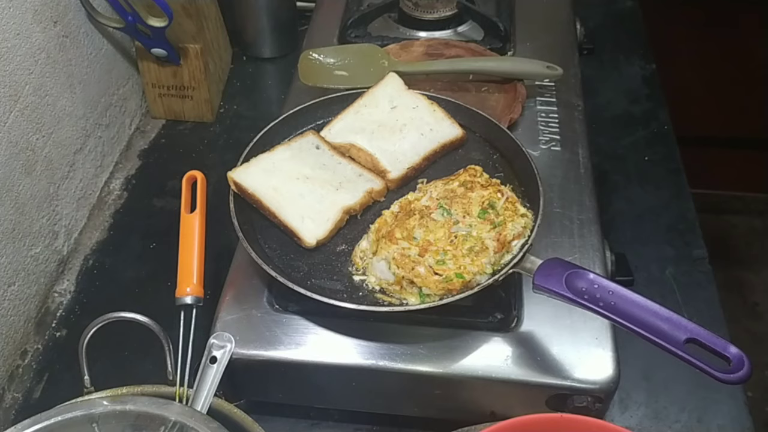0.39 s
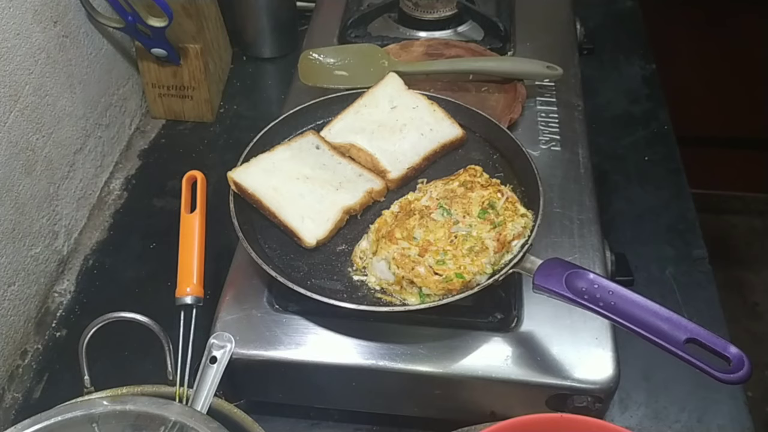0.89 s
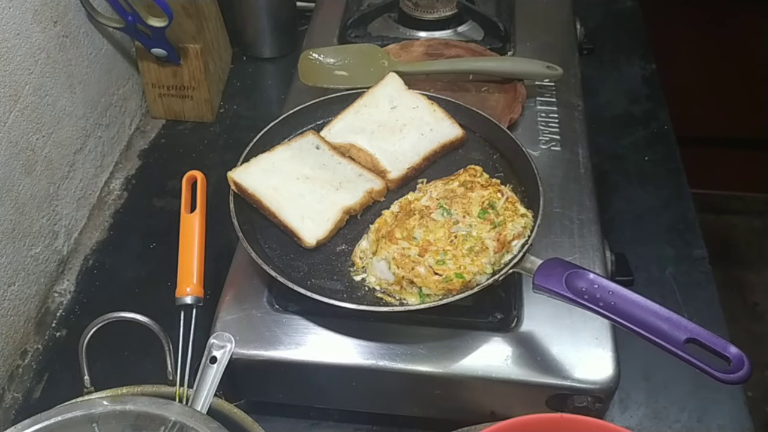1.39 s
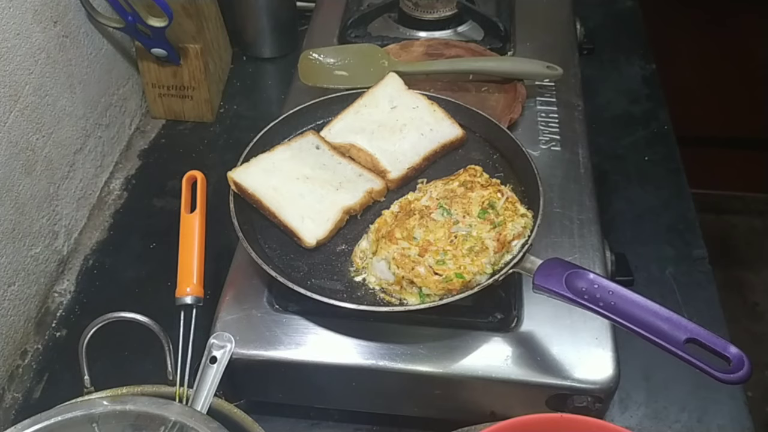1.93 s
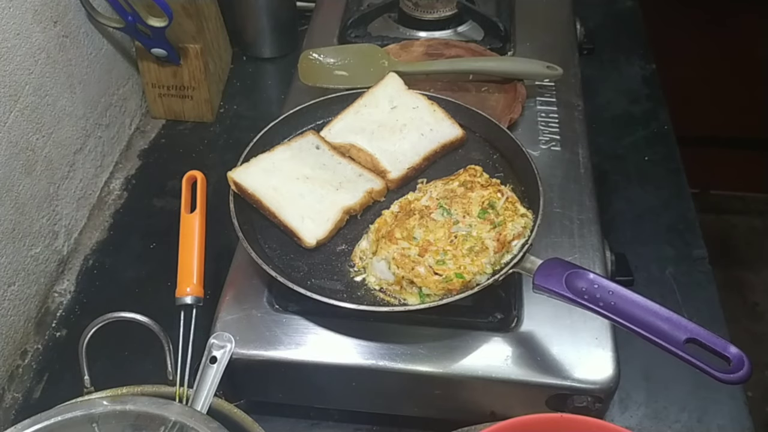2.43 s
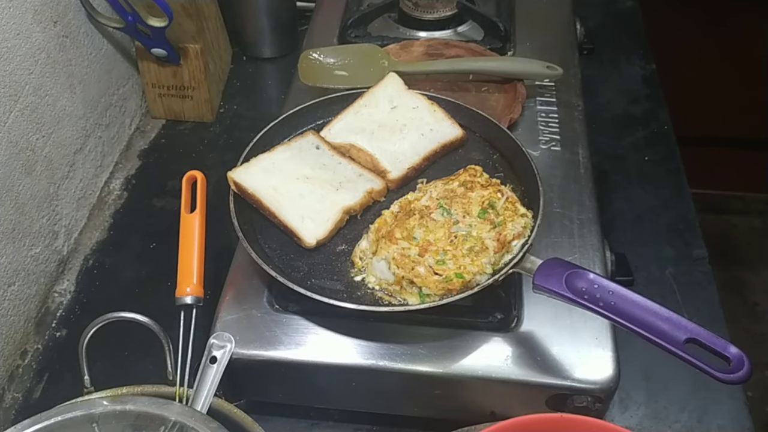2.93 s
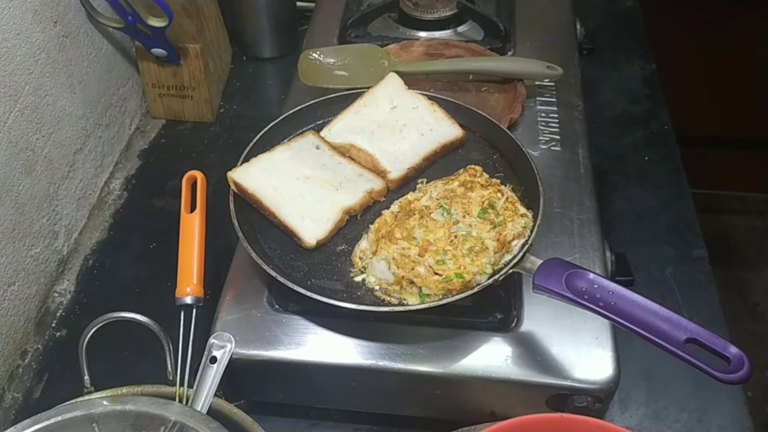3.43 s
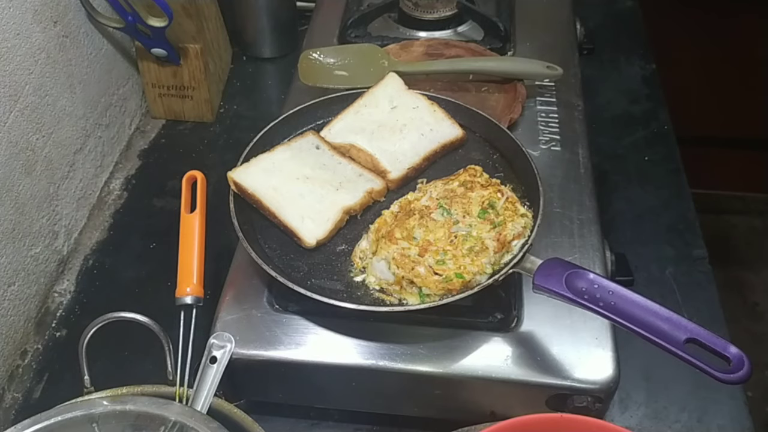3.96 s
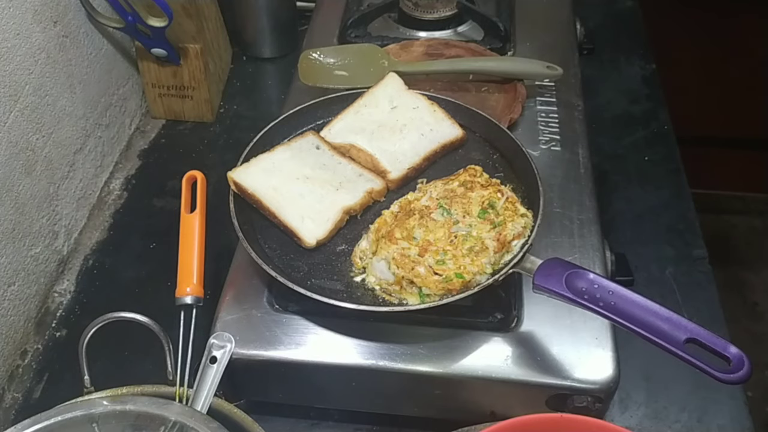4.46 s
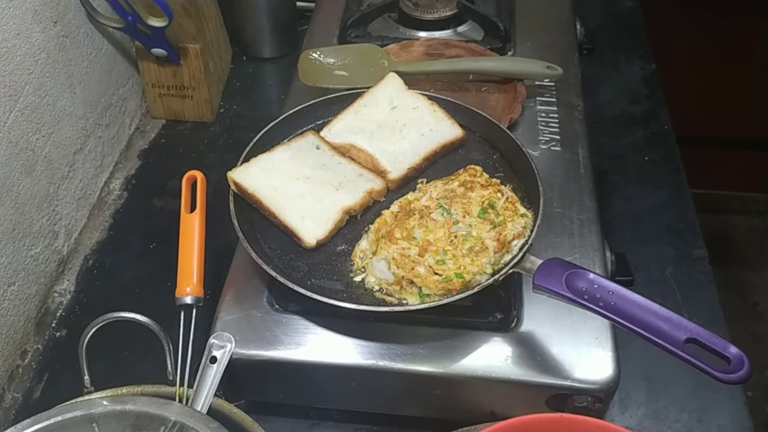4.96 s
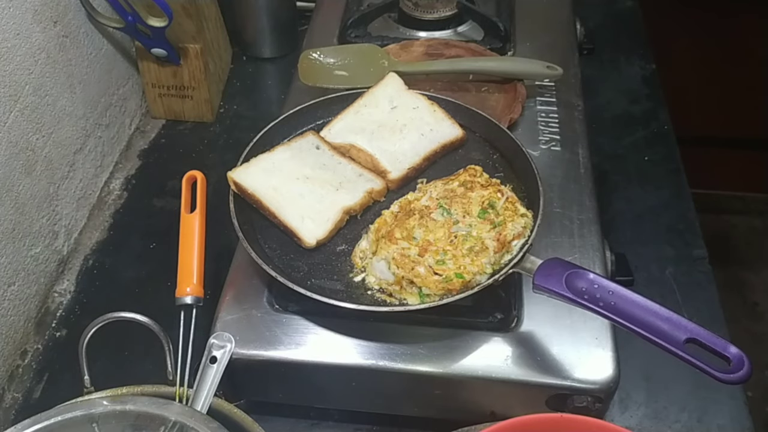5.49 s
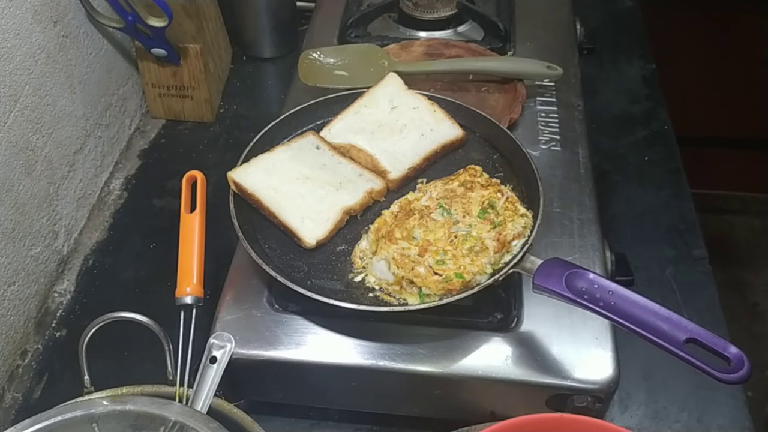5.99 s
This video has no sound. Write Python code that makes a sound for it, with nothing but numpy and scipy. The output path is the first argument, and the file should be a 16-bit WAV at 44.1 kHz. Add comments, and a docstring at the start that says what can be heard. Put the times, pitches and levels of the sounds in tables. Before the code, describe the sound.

Oil sizzling in a pan, captured by two spaced microphones close by in a small kitchen. Quiet hum and tiny spits come first, then dense, grainy steam bursts with wet gurgles underneath and dull bumps. After a short lull the frying flares in uneven spurts, snapping brightly, peaks, then eases into irregular sputters. Low rumble, steady faint flame and room hiss, no voices.

```python
"""Patty and bread frying in a pan

A kitchen stove heard by two spaced microphones. Steam bursts from under the food in spurts of
dense tiny pops over a running sizzle: random clicks, split into bands and shaped in level.
Sharp spits of oil are fading bright noise; big bubbles gurgle as noise puffs with rising notes.
Below lie soft low thumps (short waves), a lumpy rumble (low noise) and a wavering mains hum (sine);
a steady hiss of flame and room fills the background."""
import sys
import numpy as np
from scipy import signal
from scipy.io import wavfile

SR = 44100
rng = np.random.default_rng(int(sys.argv[2]) if len(sys.argv) > 2 else 0)


def gain_from_db(level_db):
    """Convert decibel levels to linear amplitude factors (20 dB per decade)."""
    decades = np.asarray(level_db, float) / 20
    return 10 ** decades


def dump(signal):
    """Clip the signal to [-1, 1] and save it as 16-bit WAV at the path in sys.argv[1]."""
    limited = np.clip(np.atleast_2d(signal).T, -1, 1)
    pcm = np.round(limited * 32767).astype(np.int16)
    wavfile.write(sys.argv[1], SR, pcm)


N = 269786
STEP = 32   # samples between control points

# All table levels are nominal: flutter, balance and tone shaping move them.
# Running sizzle. Each row: time in seconds, level in dB, fullness in dB near 300 Hz against 4500 Hz.
SIZZLE_CURVE = [(0.0, -65, -1), (0.5, -66.5, -4), (0.9, -62.5, 2), (1.1, -48.5, 5), (2.0, -48.5, 5.5),
                (2.6, -46.5, 3.5), (3.2, -50, 3.5), (3.36, -61.5, 2.5), (3.55, -66, 3), (4.0, -55, 1.6),
                (4.6, -58, 4), (5.3, -59.5, 3), (5.7, -53.5, 2.5), (6.12, -58, 2)]
# Spurts of steam. Each row: start in seconds, level in dB, rise in ms, hold in ms.
STEAM_SPURTS = [(0.081, -68, 10, 1.7), (0.374, -75, 2.3, 1.7), (0.482, -68, 7.7, 1.7),
                (0.535, -55.5, 2.9, 3.2), (0.639, -76, 11, 0.8), (0.811, -60, 12, 3.9),
                (0.918, -43.5, 21, 9.6), (0.988, -44, 11, 3.4), (1.029, -44, 5.9, 17), (1.097, -63, 21, 83),
                (1.17, -41.5, 73, 14), (1.324, -39, 15, 6.2), (1.408, -40.7, 24, 9.9),
                (1.456, -43.5, 54, 15), (1.592, -50.5, 43, 6.9), (1.624, -44, 5.1, 8.6),
                (1.722, -46.5, 6.2, 63), (1.855, -43.5, 17, 103), (1.979, -38.5, 18.5, 31),
                (2.115, -41.5, 24, 2.3), (2.173, -44, 23, 11), (2.246, -47.5, 10, 189.3),
                (2.271, -48, 11, 20), (2.478, -45, 8.3, 19), (2.533, -45.5, 19.5, 71),
                (2.692, -51, 24.0, 8.6), (2.744, -43, 67, 23), (2.841, -40.5, 31, 37),
                (2.946, -40.5, 21, 13.5), (3.056, -43, 73, 37), (3.182, -39, 71.5, 22),
                (3.35, -54.5, 6.2, 9.3), (3.397, -63, 6.6, 15), (3.447, -59.5, 10, 28.3),
                (3.555, -57.5, 21, 1.5), (3.613, -41.5, 43, 5.3), (3.674, -43, 25, 100),
                (3.779, -38.5, 57, 53), (3.89, -41, 40, 18.1), (3.983, -44, 3.7, 52),
                (4.047, -40, 54.3, 29), (4.205, -50.5, 12.5, 42), (4.262, -34.0, 31, 39),
                (4.455, -31.5, 18.0, 53), (4.64, -57, 8.2, 52), (4.695, -44, 7, 72.5),
                (4.754, -44, 6.8, 34), (4.852, -49.5, 5.9, 18.3), (4.877, -36.5, 17, 49),
                (5.003, -50.5, 4.7, 3.1), (5.058, -41, 16.5, 62), (5.178, -48, 3, 2.5),
                (5.218, -47, 30, 0.3), (5.313, -51.5, 20, 32), (5.402, -40.5, 30.4, 21),
                (5.474, -43.5, 19, 52), (5.586, -44, 10, 82), (5.746, -49.5, 10, 12),
                (5.858, -39.5, 21.6, 45), (5.972, -55, 10, 24.0), (6.048, -50.5, 3.1, 4.2),
                (6.095, -39.5, 17, 1.1)]
# Tone of the frying. Each row: frequency in Hz, density in dB per Hz.
SIZZLE_SPECTRUM = [(150, -37), (250, -6.5), (398, -9), (465, -5.5), (591, -6), (1080, -3.5), (1260, -5.5),
                   (1840, -4), (2010, -2), (3540, -2.5), (9950, 0), (14000, -8), (15300, -11)]
# Likeness of left and right. Each row: frequency in Hz, correlation from -1 to 1.
STEREO_LIKENESS = [(60, 0.99), (99, 0.99), (160, 0.98), (270, 0.8), (450, 0.73), (740, 0.25), (1220, -0.05),
                   (2010, 0.05), (3330, -0.03), (5500, 0.04), (9080, -0.03), (15000, 0.03)]
# Single sharp spits of oil. Each row: start in seconds, peak level in dB.
OIL_SPITS = [(0.088, -48), (0.377, -42), (0.488, -44), (0.546, -32.5), (0.65, -39.5), (0.9348, -32),
             (1.0087, -21.5), (1.3319, -19.5), (1.427, -35), (1.607, -42), (1.7245, -43), (1.8754, -25),
             (2.1294, -24), (2.7926, -23), (2.955, -19), (3.6274, -46), (3.646, -32), (3.92, -32),
             (4.1, -19.5), (4.2152, -27.5), (4.28, -36), (4.447, -35), (4.4646, -19), (4.7024, -36),
             (4.859, -29.5), (4.888, -46), (5.01, -30.5), (5.057, -38), (5.074, -41), (5.1827, -32),
             (5.2276, -40), (5.242, -27), (5.421, -30), (5.598, -26), (5.8686, -30), (6.1035, -34)]
# Big bubbles from under the food. Each row: start in seconds, level in dB, length in seconds,
# pitch in Hz halfway through.
BUBBLE_GURGLES = [(0.048, -62.5, 0.035, 654), (0.79, -60, 0.061, 720), (0.931, -53.5, 0.061, 490),
                  (1.182, -52, 0.019, 292), (1.40, -55, 0.04, 498), (1.737, -46.5, 0.041, 435),
                  (1.887, -48.5, 0.032, 486), (2.224, -48, 0.032, 282), (2.282, -39, 0.026, 316),
                  (2.508, -53, 0.03, 294), (2.707, -45, 0.035, 274), (2.898, -42, 0.047, 288),
                  (2.943, -47, 0.042, 255), (3.219, -48, 0.024, 470), (4.289, -56, 0.078, 386),
                  (4.475, -49.5, 0.071, 555), (4.696, -53.5, 0.042, 332), (4.752, -50.5, 0.031, 300),
                  (4.894, -53, 0.033, 464), (5.857, -57, 0.031, 533)]
# Soft low thumps. Each row: middle in seconds, peak level in dB, pitch in Hz.
LOW_THUMPS = [(0.102, -42.5, 121), (0.379, -64, 109), (0.826, -42.5, 90), (0.873, -34.5, 111),
              (0.957, -35, 106), (0.986, -26, 140), (1.091, -24.5, 117), (1.131, -30, 122),
              (1.571, -33.5, 125), (1.863, -27, 127), (1.907, -30.5, 123), (2.072, -33, 117),
              (2.112, -33, 155), (2.15, -35, 130), (2.177, -24.5, 185), (2.266, -43, 170),
              (2.377, -27.5, 170), (2.402, -35, 162), (2.476, -35.5, 144), (2.982, -40, 100),
              (3.096, -42, 137), (3.18, -34, 141), (3.464, -54, 119), (3.719, -42, 145),
              (4.117, -36.5, 151), (4.31, -47, 140), (4.427, -41, 151), (4.447, -35.5, 169),
              (5.569, -36.5, 80.5), (5.611, -37, 120), (5.67, -36, 133), (5.718, -21, 168),
              (5.735, -33, 141), (5.77, -34, 158), (5.796, -25.5, 107), (5.807, -29.5, 147),
              (5.828, -34, 151), (5.874, -37, 110)]
# Tone of the rumble. Each row: frequency in Hz, density in dB per Hz.
RUMBLE_SPECTRUM = [(15, -51), (25, -20), (43, -14), (73, 0.5), (103, -1.5), (126, -3), (152, -13.5),
                   (183, -22), (500, -33.5), (650, -61), (1100, -120)]
# Rumble between thumps. Each row: time in seconds, level in dB.
CALM_RUMBLE_CURVE = [(0, -55), (.35, -58.5), (.7, -68), (1.2, -50.5), (1.45, -61.5), (2.3, -52), (2.8, -56),
                     (3.6, -54.5), (4.0, -57.5), (4.7, -58.5), (5.35, -60.5), (5.55, -63), (5.85, -48.5),
                     (6.12, -63)]
# Swell and sag of the hum. Each row: time in seconds, level in dB.
HUM_CURVE = [(0, -48), (.2, -42.5), (.8, -45.5), (1.35, -49), (1.65, -42.5), (2.4, -50.5), (2.8, -47.5),
             (3.55, -44), (4.0, -50.5), (4.6, -44), (5.2, -50), (5.5, -48.5), (6.12, -47)]
# Tone of the flame and room hiss. Each row: frequency in Hz, density in dB per Hz.
HISS_SPECTRUM = [(170, -20), (260, 2.5), (500, -5.5), (1000, -8.5), (2000, -11.5), (4000, -11),
                 (8000, -20.5), (10500, -3.5), (13000, -7.5), (15300, -13)]


def rms_one(x):
    """Scale to unit rms."""
    return x / np.sqrt(np.mean(x ** 2) + 1e-20)


def coarse_time():
    """Times of the control points in seconds."""
    return np.arange(N // STEP + 2) * STEP / SR


def in_time(rows):
    """Read each column of a time curve at the control points."""
    s, *columns = np.transpose(rows)
    return [np.interp(coarse_time(), s, column) for column in columns]


def fine(control):
    """Glide from control points to samples."""
    return np.interp(np.arange(N) / STEP, np.arange(len(control)), control)


def at_hz(points, hz):
    """Read a tone table on a log-frequency axis."""
    table_hz, value = np.transpose(points)
    return np.interp(np.log(hz), np.log(table_hz), value)


def drift(rate_hz):
    """Random wander of unit rms at the control points: noise through two equal one-pole lowpasses."""
    r = np.exp(-2 * np.pi * STEP * rate_hz / SR)
    noise = rng.standard_normal(N // STEP + 2002)
    slow = signal.lfilter([1], [1, -2 * r, r * r], noise)[2000:]   # skip the settling
    return rms_one(slow)


def bands(source, edges, spectrum, gain_at):
    """Split noise into bands, each with its own tone level, moving gain and left-right likeness."""
    centres = np.sqrt(edges[1:] * edges[:-1])
    power = np.sum(gain_from_db(at_hz(spectrum, centres)) ** 2 * np.diff(edges))
    total = np.sqrt(power * 2 / SR)
    out = 0
    for k, hz in enumerate(centres):
        sos = signal.butter(2, edges[k:k + 2], "band", fs=SR, output="sos")
        mid, side = signal.sosfilt(sos, source[k % 2])   # neighbouring bands use separate noise
        alike = np.clip(at_hz(STEREO_LIKENESS, hz), -.99, .99)
        pair = np.sqrt(1 + alike) * mid + np.sqrt(1 - alike) * side * [[1], [-1]]
        out = out + gain_from_db(at_hz(spectrum, hz)) * fine(gain_at(hz)) * pair
    return out / total


def pops(per_s, spread_db, flares_per_s, flare_db):
    """Thousands of bubbles burst each second with uneven force; short flares lift both sides."""
    shape = (2, 2, N)
    born = rng.random(shape) < per_s / SR
    force = gain_from_db(spread_db * np.minimum(rng.exponential(1, shape), 5))
    flare_born = rng.random(N) < flares_per_s / SR
    flares = flare_born * gain_from_db(flare_db + 1.0 * rng.standard_normal(N))
    swell = 1 + signal.lfilter([1], [1, -.985], flares)   # time constant about 1.5 ms
    return rms_one(swell * born * force * rng.standard_normal(shape))


def spurt_shapes():
    """Power of each steam spurt, which rises, holds with a slow sag and dies away."""
    t60_s, sag_db_per_s = 0.19, 8   # the sag starts after the rise and adds to the fade
    at, _, rise_ms, hold_ms = np.array(STEAM_SPURTS).T[:, :, None]
    age_ms = 1000 * np.maximum(coarse_time() - at, 0)
    rise = np.sin(np.pi / 2 * np.minimum(age_ms / rise_ms, 1)) ** 2
    fading_s = np.maximum(age_ms - rise_ms - hold_ms, 0) / 1000
    sagging_s = np.maximum(age_ms - rise_ms, 0) / 1000
    return (rise * gain_from_db(-60 * fading_s / t60_s - sag_db_per_s * sagging_s)) ** 2


def sizzle():
    """Bubbles pop densely, shaped by the running level and the spurts of steam."""
    usual_spurt_db, usual_thinning_db, thinning_per_db = -44, 3, 0.3
    level_db, fullness_db = in_time(SIZZLE_CURVE)
    spurt_db = np.array(STEAM_SPURTS)[:, 1]
    spurt_power = spurt_shapes()
    thin_db = usual_thinning_db + thinning_per_db * (spurt_db - usual_spurt_db)
    sputter_db = 1.97 * drift(24) + 0.1 * drift(90)   # all bands surge together

    def gain_at(hz):
        """Lower bands follow the fullness, less so in strong spurts; every band also flickers alone."""
        low = np.clip(np.log2(4500 / hz) / 3.9, -.4, 1.4)   # 0 at 4500 Hz, about 1 at 300 Hz
        spurts = gain_from_db(spurt_db - low * thin_db) ** 2 @ spurt_power
        vigour = np.sqrt(gain_from_db(level_db) ** 2 + spurts)   # powers add
        flicker_db = 1.46 * drift(9.4) + 1.25 * drift(33)
        return vigour * gain_from_db(low * fullness_db + sputter_db + flicker_db)

    edges = np.geomspace(230, 16500, num=30)
    bubbles = pops(per_s=14000, spread_db=-0.5, flares_per_s=45, flare_db=-9.5)
    return bands(bubbles, edges, SIZZLE_SPECTRUM, gain_at)


def spits(t60_s=0.043, rms_below_peak_db=9, centre_hz=10300):
    """A droplet bursts: a bright crack that dies fast, different at the two microphones."""
    length = 4000
    out, age_s = np.zeros((2, N + length)), np.arange(length) / SR
    sos = signal.butter(1, [centre_hz * .55, centre_hz * 1.5], "band", fs=SR, output="sos")
    for at, peak_db in OIL_SPITS:
        start = round(at * SR)
        crack = rms_one(signal.sosfilt(sos, rng.standard_normal((2, length))))
        out[:, start:start + length] += gain_from_db(peak_db - rms_below_peak_db - 60 * age_s / t60_s) * crack
    return out[:, :N]


def gurgles(low_hz=240, high_hz=950, alike=0.15, tone=0.71, rising=0.22):
    """A dull puff swells and fades while the bubble sings a short rising note."""
    at, level_db, length_s, _ = np.array(BUBBLE_GURGLES).T[:, :, None]
    turn = np.clip((coarse_time() - at) / length_s, 0, 1)
    gain = fine(gain_from_db(level_db[:, 0]) @ np.sin(np.pi * turn))
    sos = signal.butter(2, [low_hz, high_hz], "band", fs=SR, output="sos")
    mid, side = signal.sosfilt(sos, rng.standard_normal((2, N)))
    puff = mid + side * [[1], [-1]] * np.sqrt((1 - alike) / (1 + alike))
    out = gain * rms_one(puff)
    for at, level_db, length_s, hz in BUBBLE_GURGLES:
        start = round(at * SR)
        turn = np.linspace(0, 1, int(length_s * SR))
        cycles = hz * length_s * turn * (1 + rising * (turn - 1))   # pitch climbs by 2 * rising * hz
        note = np.sin(np.pi * turn) * np.sin(2 * np.pi * cycles)
        out[:, start:start + len(turn)] += tone * gain_from_db(level_db) * note
    return out


def thumps(cycles=0.49):
    """Each thump is a push and a deeper rebound, about one cycle long."""
    out = np.zeros(N)
    for at, peak_db, hz in LOW_THUMPS:
        middle, half = round(at * SR), int(2 * SR / hz)
        turn = np.arange(-half, half) * hz / SR
        wave = np.sin(2 * np.pi * turn + .7) * np.exp(-(turn / cycles) ** 2)
        out[middle - half:middle + half] -= gain_from_db(peak_db) * wave
    return out


def rumble():
    """Low noise flutters in lumps and swells round the strongest thump near by."""
    swell_s, usual_swell_db = 0.048, -45.5
    usual_thump_db, usual_thump_hz = -33, 130
    follow, db_per_octave = .35, -0.5   # dB per dB of thump; deep thumps stir up more rumble
    at, peak_db, hz = np.array(LOW_THUMPS).T[:, :, None]
    strength_db = follow * (peak_db - usual_thump_db)
    depth_db = db_per_octave * np.log2(hz / usual_thump_hz)
    swells = gain_from_db(usual_swell_db + strength_db + depth_db)
    swells = swells * np.exp(-((coarse_time() - at) / swell_s) ** 2)
    calm = gain_from_db(in_time(CALM_RUMBLE_CURVE)[0])
    lumps = np.sqrt(calm ** 2 + np.max(swells, axis=0) ** 2) * gain_from_db(0.78 * drift(27.0))
    edges = np.geomspace(22, 520, num=10)
    noise = rng.standard_normal((2, 2, N))
    return bands(noise, edges, RUMBLE_SPECTRUM, lambda hz: lumps * gain_from_db(2.2 * drift(3.6)))


def hum(hz=101.1):
    """A sine at twice the mains frequency, wavering a little in phase and level."""
    level_db, = in_time(HUM_CURVE)
    waver = fine(1.16 * drift(2.46) + 0.42 * drift(7.5))   # radians
    phase = 2 * np.pi * hz * np.arange(N) / SR + waver
    level = fine(gain_from_db(level_db + 0.66 * drift(3.1)))
    return np.sqrt(2) * level * np.sin(phase)


def hiss(level_db=-64.5):
    """Flame and room make a smooth noise, each band wandering only slightly in level."""
    edges = np.geomspace(180, 16500, num=14)
    noise = rng.standard_normal((2, 2, N))
    return bands(noise, edges, HISS_SPECTRUM, lambda hz: gain_from_db(level_db + .5 * drift(3)))


def scene():
    """Hum and thumps reach both microphones alike; some direct pan sound reaches the right one later."""
    share, later_s = 0.057, .00039   # share of the left signal's amplitude, delay to the right
    centre = hum() + thumps()
    left, right = sizzle() + spits()
    late = np.interp(np.arange(N) - round(later_s * SR), np.arange(N), left)
    direct = np.array([left, share * late + np.sqrt(1 - share ** 2) * right])
    pan = direct + gurgles() + hiss()
    # the pan leans slightly left, the hum and thumps slightly right
    return pan * gain_from_db([[.2], [-.2]]) + rumble() + centre * gain_from_db([[-.2], [.2]])


def top_cut(x):
    """Nothing passes above the cut-off."""
    return signal.sosfilt(signal.butter(12, 16460, fs=SR, output="sos"), x)


def record(dry):
    """A steep lowpass takes off the extreme top, 60 dB down from 16.1 kHz."""
    lowpass = signal.cheby2(12, 60, 16100, fs=SR, output="sos")
    finished = signal.sosfilt(lowpass, dry)
    return top_cut(finished)


dry = scene()
out = record(dry)
dump(out)
```